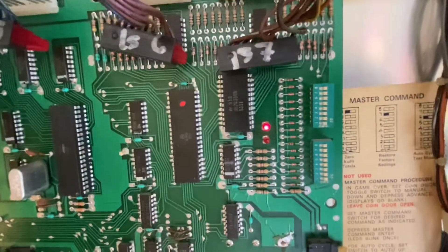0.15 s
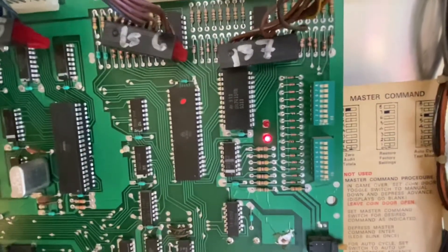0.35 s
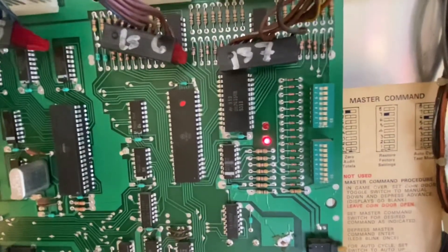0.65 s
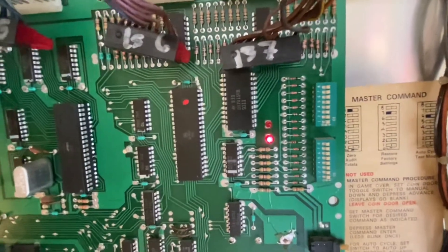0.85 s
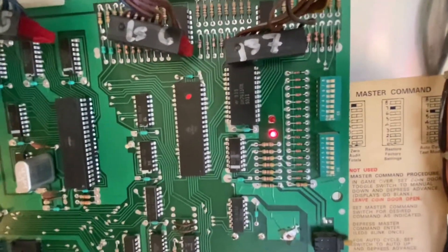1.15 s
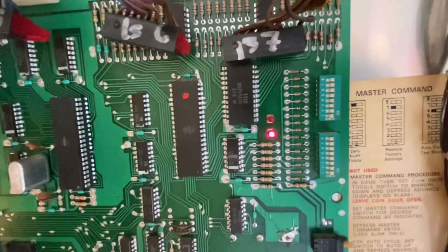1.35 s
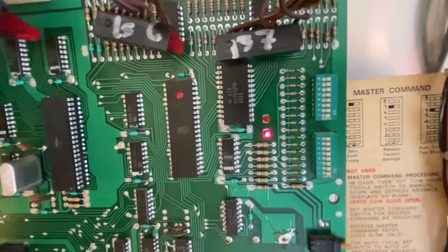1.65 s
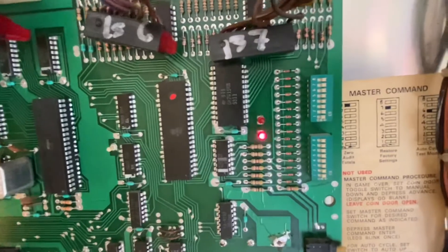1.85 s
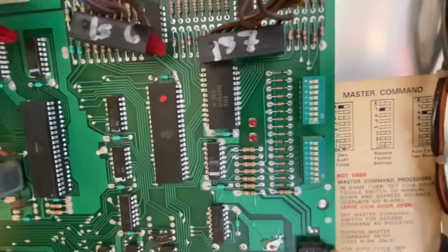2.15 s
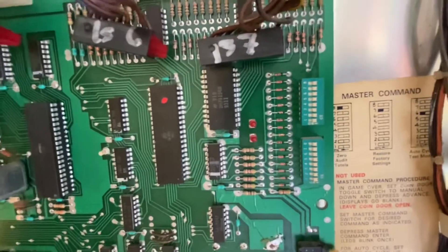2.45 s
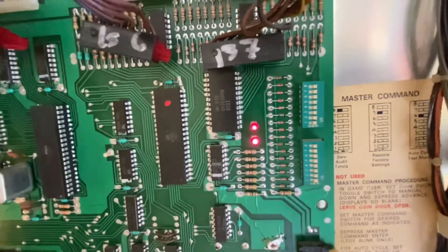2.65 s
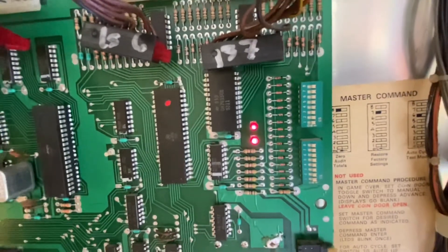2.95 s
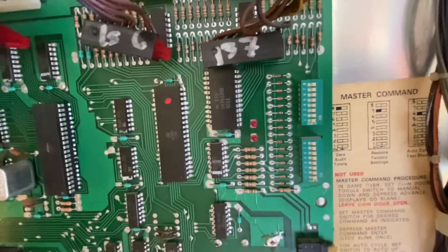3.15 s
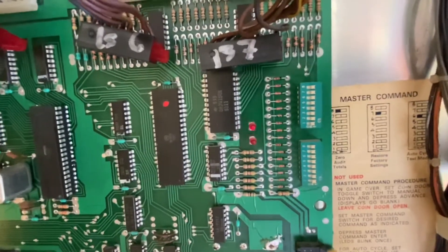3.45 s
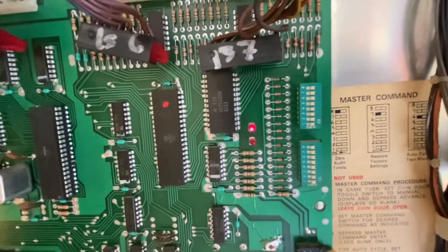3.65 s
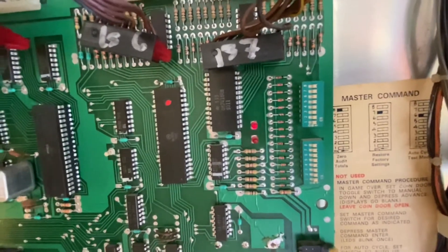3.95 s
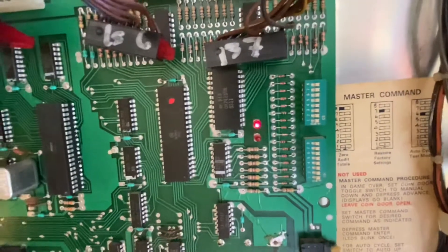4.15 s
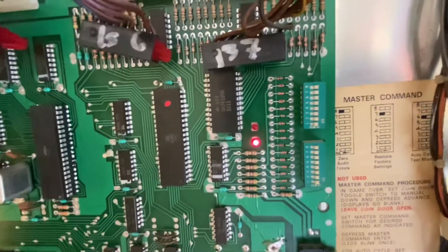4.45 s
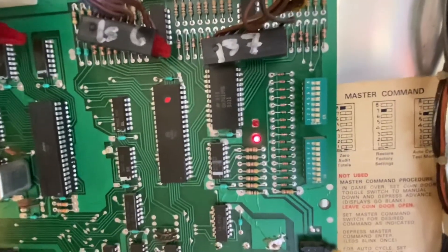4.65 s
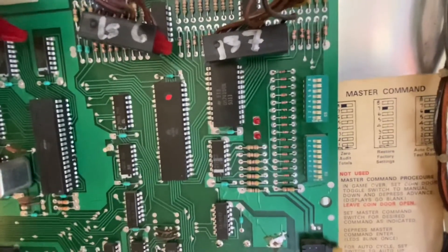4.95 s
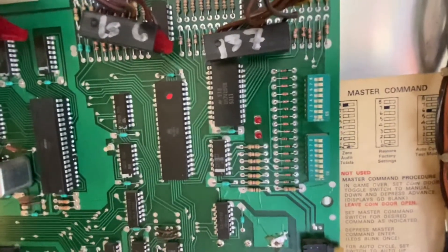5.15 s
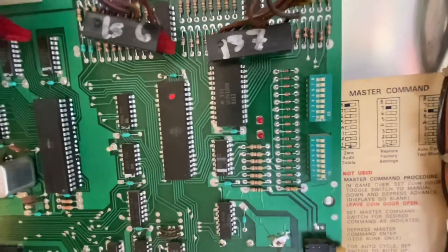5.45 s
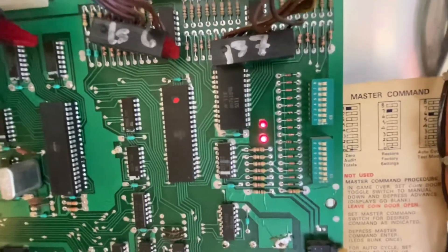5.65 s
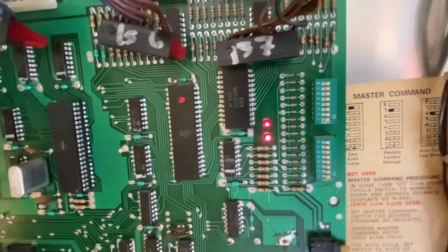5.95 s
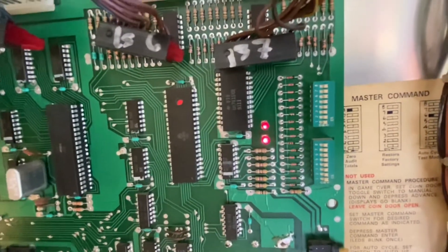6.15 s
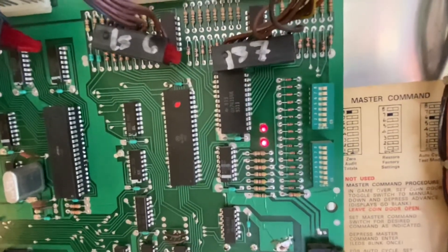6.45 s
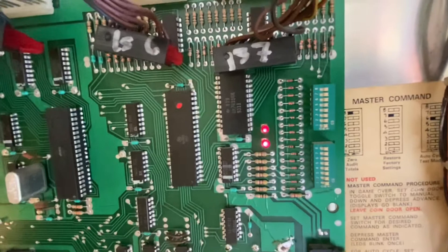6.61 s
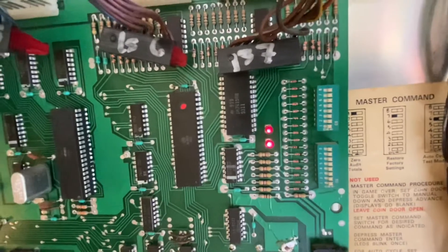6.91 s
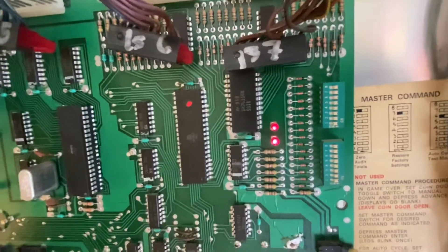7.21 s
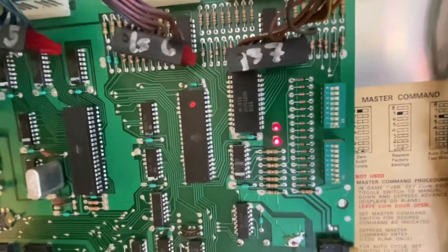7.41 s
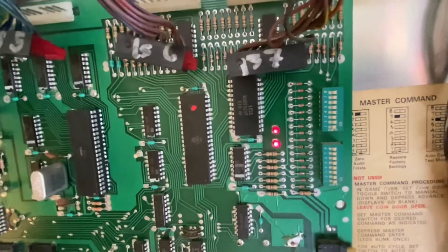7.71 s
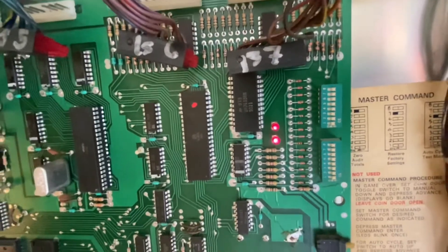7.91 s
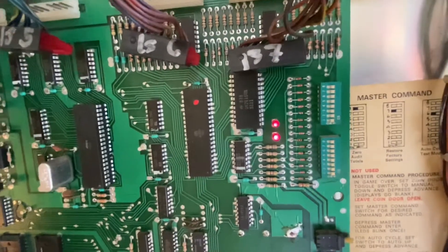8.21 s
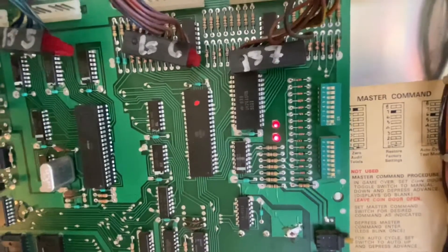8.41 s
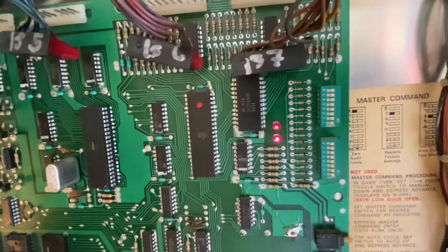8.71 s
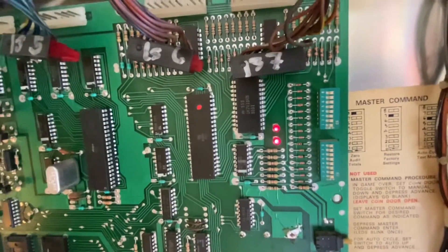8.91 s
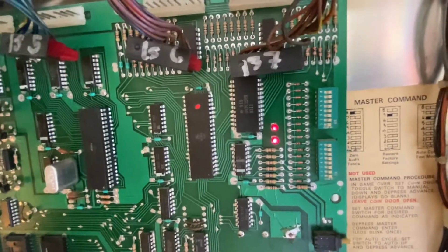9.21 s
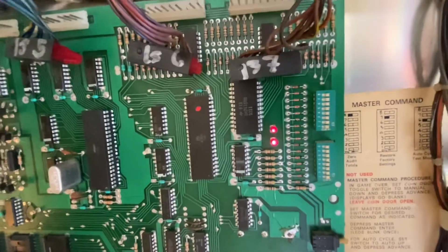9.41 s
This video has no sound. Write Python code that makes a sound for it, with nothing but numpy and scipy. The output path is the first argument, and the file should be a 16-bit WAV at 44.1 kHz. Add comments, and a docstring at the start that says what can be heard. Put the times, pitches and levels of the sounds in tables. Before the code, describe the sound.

A faint squeak, one double click, then a fast hard relay chatter; after quiet humming, a single loud clack and slightly stronger hum.

```python
"""A relay in the open backbox of a powered pinball machine, heard from close by over hum and room rumble.
After one faint squeak of overlapping glides it pulls in and drops out once, then chatters sixteen times.
A squeak later it pulls in and holds: the hum and the rush of air step up; one last squeak follows.
Blows are impacts with a spray of bounces, played through noise bursts and ringing modes of frame,
springs and box; the hum is a sum of mains harmonics, the room is coloured noise, squeaks are rough glides."""
import sys
import numpy as np
from scipy import signal
from scipy.io import wavfile

SR = 44100
rng = np.random.default_rng(int(sys.argv[2]) if len(sys.argv) > 2 else 0)


def store_wav(level_fs):
    """Save 16-bit WAV to argv[1]."""
    pcm = np.round(np.clip(np.atleast_2d(level_fs), -1, 1) * 32767)
    wavfile.write(sys.argv[1], SR, pcm.T.astype(np.int16))


N = 422037

# stereo image of the relay: hz, left_right_correlation [-1 to 1]
RELAY_LIKENESS = [(130, 0.99), (300, 0.97), (640, 0.6), (1400, 0.52), (3000, -0.063), (7000, -0.019),
                  (15000, -0.432)]
# the last pull, after which the relay holds
LATCH_S = 6.05


def relay():
    """The magnet pulls the armature in hard; the spring returns it more softly, thumping the panel."""
    # panels of the box and the relay frame, levels relative to the blow: hz, t60_s, pull_db, drop_db
    panel_modes = [(137, .5, -53, -50), (165, .55, -50, -58), (182, .33, -38, -37), (275, .5, -51, -48),
                   (297, .55, -58, -38), (319, .63, -52, -34), (338, .5, -48, -43), (366, .24, -45, -45),
                   (408, .26, -44, -56), (547, .22, -41, -36), (571, .33, -47, -38), (603, .22, -44, -35),
                   (630, .45, -50, -43), (667, .35, -56, -51), (684, .18, -45, -42), (729, .3, -47, -45),
                   (836, .35, -47, -54), (1079, .26, -43, -56), (1183, .15, -45, -50),
                   (1678, .14, -46, -41), (1816, .17, -43, -43), (2333, .14, -39, -43),
                   (3090, .06, -36, -39), (4134, .09, -41, -36), (4766, .1, -45, -33),
                   (5330, .06, -38, -31), (5660, .05, -34, -27), (6293, .09, -35, -32),
                   (7740, .07, -40, -34), (11900, .07, -38, -48)]
    # spectral density of the clack before its overall gain: hz, relative_db
    pull_colour = [(110, -1.5), (200, -3), (300, -8.5), (600, -2.5), (1200, -6.5), (1650, -2.5), (2050, -4),
                   (2700, 2), (5000, -3.5), (6800, -1), (8300, -9.5), (9800, -2.5), (13400, -11.5),
                   (15500, -9)]
    drop_colour = [(110, 0), (200, -3.5), (450, -7), (620, 7), (1200, -6), (2000, 0), (3000, -2), (5000, 3),
                   (6200, 5.5), (7600, -4), (9400, -3), (11000, -1.5), (13400, -15.5), (15500, -5.5)]
    pulls, drops = armature()

    pull_force = blows(pulls, bounce_db=-7.5, bounce_s=0.0054)
    pull_snap = snap(level_db=-4.5, low_hz=8696, decay_s=0.00033)
    pull_clack = clack(pull_colour, rattle_s=0.006, t60_at_6khz=0.055, build_at_6khz_s=0.00063)
    pull_ring = ringing(panel_modes, 0, build_at_500hz_s=0.0066)
    pull = excite(pull_force, pull_snap, from_db(6.5) * pull_clack, pull_ring)

    drop_force = blows(drops, bounce_db=-5.5, bounce_s=0.0028)
    drop_clack = clack(drop_colour, rattle_s=0.0017, t60_at_6khz=0.056, build_at_6khz_s=0.0011)
    drop_ring = ringing(panel_modes, 1, build_at_500hz_s=0.0024)
    drop = excite(drop_force, from_db(3) * drop_clack, drop_ring)
    return pull + drop + springs(pulls, drops)


def armature():
    """Pulls and drops as (start_s, level_db): one of each per cycle, then a last pull that holds."""
    # the coil is switched on and off in runs: start_s, cycles [count]
    runs = [(2.4869, 1), (3.1211, 16)]
    cycle_s, pull_to_drop_s = .07327, .02535
    pull_level_db, drop_level_db, scatter_db = 2.5, 1.37, 0.61
    from_rest_db = -1.5  # a pull from rest is softer than one in mid-chatter
    pulls, drops = [], []
    for start_s, cycles in runs:
        for k in range(cycles):
            pull_s = start_s + k * cycle_s
            pull_db, drop_db = rng.normal([pull_level_db, drop_level_db], scatter_db)
            if k == 0:
                pull_db += from_rest_db
            pulls.append((pull_s, pull_db))
            drops.append((pull_s + pull_to_drop_s, drop_db))
    pulls.append((LATCH_S, pull_level_db + from_rest_db))
    return pulls, drops


def blows(rows, bounce_db, bounce_s):
    """Contact force: one impact a row, then a spray of tiny bounces that differs every time."""
    t = np.arange(SR // 80) / SR
    bright = signal.butter(1, 1500, "high", fs=SR, output="sos")
    noise = rng.standard_normal((len(rows), len(t)))
    sprays = signal.sosfilt(bright, noise) * np.exp(-t / bounce_s)
    force = np.zeros(N)
    for (start_s, level_db), spray in zip(rows, sprays):
        at = round(start_s * SR)
        force[at] += from_db(level_db)
        force[at:at + len(t)] += from_db(level_db + bounce_db) * energy_one(spray)
    return force


def snap(level_db, low_hz, decay_s):
    """The first sharp crack of steel on steel: a very short burst of high-passed noise."""
    t = np.arange(SR // 100) / SR
    crack = rng.standard_normal((2, len(t))) * np.exp(-t / decay_s)
    high_pass = signal.butter(2, low_hz, "high", fs=SR, output="sos")
    return from_db(level_db) * energy_one(signal.sosfilt(high_pass, crack))


def clack(colour, rattle_s, t60_at_6khz, build_at_6khz_s):
    """The relay's crowded, heavily damped modes as bands of noise, followed by the box's reverberation."""
    # decay of the box's reverberation: hz, t60_s
    box_t60 = [(150, 1), (300, 0.68), (700, 0.17), (2000, 0.53), (5000, 0.5), (11000, 0.31), (14000, 0.3)]
    # energy of the reverberation against the direct clack: hz, relative_db
    box_share = [(150, 7), (600, 14), (1300, -7), (3000, -28), (6500, -21), (11000, -24.5), (16000, -29)]
    t = np.arange(SR * 3 // 4) / SR
    edges = np.geomspace(110, 17000, 30)
    out = 0
    for hz, width, noise in noise_bands(edges, RELAY_LIKENESS, size=len(t)):
        # bending waves disperse: the treble builds first, the bass swells later
        swell = 1 - np.exp(-t / (build_at_6khz_s * 6000 / hz))
        # the armature rattles for a few milliseconds, holding up the bright middle of the clack
        rattle = rattle_s * np.exp(-np.log(hz / 5800) ** 2 / .5)
        direct_t60 = t60_at_6khz * (6000 / hz) ** 0.22
        direct = swell * from_db(-60 * np.maximum(t - rattle, 0) / direct_t60)
        tail = (1 - np.exp(-t / 0.023)) * from_db(-60 * t / at_hz(box_t60, hz))
        share = from_db(at_hz(box_share, hz))
        envelope = np.hypot(energy_one(direct), share * energy_one(tail))
        gain = from_db(at_hz(colour, hz)) * panned(hz) * np.sqrt(2 * width / SR)
        out = out + gain * energy_one(noise * envelope)
    return out


def ringing(modes, stroke, build_at_500hz_s):
    """Distinct modes answer a pull (0) or a drop (1) as decaying sines; likeness sets their stereo phase."""
    t = np.arange(SR) / SR
    out = 0
    for hz, t60, *level_db in modes:
        likeness = np.clip(at_hz(RELAY_LIKENESS, hz), -1, 1)
        apart = np.arccos(likeness) / 2 * np.array([[1], [-1]])
        swell = 1 - np.exp(-t / (build_at_500hz_s * np.sqrt(500 / hz)))
        decay = from_db(level_db[stroke] - 60 * t / t60)
        out = out + panned(hz) * swell * decay * np.sin(2 * np.pi * hz * t + apart)
    return out


def springs(pulls, drops):
    """Each blow stops the springs and sets them ringing afresh, so only the last one of a burst rings out."""
    # springs and contact blades: hz, t60_s, pull_db, drop_db
    spring_modes = [(1001, .7, -70, -51), (1260, .64, -43, -57), (2175, 1.15, -65, -54),
                    (2493, .9, -73, -64), (3328, .72, -54, -53), (3718, .66, -51, -50),
                    (4469, 1.1, -68, -78), (5527, .9, -56, -69), (6654, .4, -53, -64),
                    (7262, .55, -62, -63), (10048, .65, -72, -64), (10190, .45, -66, -61),
                    (10577, .36, -50, -62), (11826, .33, -54, -66), (12700, .5, -57, -74)]
    rings = [ringing(spring_modes, stroke, build_at_500hz_s=0.0018) for stroke in (0, 1)]
    strokes = []
    for stroke, rows in enumerate((pulls, drops)):
        strokes += [(round(start_s * SR), stroke) for start_s, _ in rows]
    out = np.zeros((2, N))
    for at, stroke in sorted(strokes):
        out[:, at:at + SR] = rings[stroke]
    return out


def excite(force, *responses):
    """Play a force through the sum of several stereo responses by convolution."""
    whole = sum(np.pad(r, ((0, 0), (0, SR - r.shape[1]))) for r in responses)
    return signal.oaconvolve(force[None], whole, axes=1)[:, :N]


def panned(hz):
    """Left and right gain at a frequency: the box is heard off centre."""
    # hz, left_minus_right_db
    balance = [(150, 0), (310, -1.5), (550, -2.5), (1100, 6), (2400, 1), (5000, -1.5), (12000, 1)]
    return from_db(at_hz(balance, hz) / 2 * np.array([[1], [-1]]))


def transformer(waver_db):
    """Mains harmonics, in the centre; most of all the upper ones grow with the load, and all waver."""
    # rms levels at no load and full load, before the waver: mains_multiple, idle_db, loaded_db
    harmonics = [(2, -57, -55.5), (3, -75.5, -70.5), (4, -73, -72), (6, -87.5, -83.5), (8, -99.5, -84.5),
                 (10, -86.5, -76.5), (12, -97, -89), (16, -83.5, -77), (20, -99, -80), (22, -107, -103)]
    mains_hz = 60
    t, load = np.arange(N) / SR, electrical_load()
    knots = np.linspace(0, N / SR, 40)
    out = 0
    for multiple, idle_db, loaded_db in harmonics:
        waver = waver_db * np.interp(t, knots, rng.standard_normal(len(knots)))
        gain = np.sqrt(2) * from_db(idle_db + (loaded_db - idle_db) * load + waver)
        out = out + gain * np.sin(2 * np.pi * (round(multiple) * mains_hz * t + rng.random()))
    return out


def electrical_load():
    """Load 0-1 at every sample: a slow warm-up to a standby share, then a quick rise as the relay holds."""
    standby_load, warm_up_s, power_on_s = 0.7, 2.6, .06
    t = np.arange(N) / SR
    warm = 1 - np.exp(-t / warm_up_s)
    powered = 1 - np.exp(-np.maximum(t - LATCH_S, 0) / power_on_s)
    return standby_load * warm + (1 - standby_load) * powered


def room():
    """Low rumble that wanders in level and a faint rush of air that grows with the load, both noise."""
    # spectral density before levelling: hz, relative_db
    rumble_colour = [(25, -27.5), (36, -12.5), (50, 2), (66, -2.5), (90, -1.5), (135, -7.5), (150, -19),
                     (175, -13.5), (230, -23), (300, -24), (400, -35.5)]
    air_colour = [(460, -2), (520, 4.5), (660, -2.5), (950, 2.5), (1200, -4.5), (1500, -15), (2400, -20.5),
                  (5500, -23), (7500, -33.5), (10000, -29.5), (14000, -35.5)]
    rumble_mean_db, rumble_wander_db = -53.5, 1
    air_idle_db, air_loaded_db = -74, -69
    bass = signal.butter(4, [33, 390], "band", fs=SR, output="sos")
    rumble = signal.sosfilt(bass, steady_noise(rumble_colour, np.geomspace(25, 400, 17)))
    air = steady_noise(air_colour, np.geomspace(460, 14000, 18))
    rumble_db = rumble_mean_db + rumble_wander_db * wander(step_s=0.32)
    air_db = air_idle_db + (air_loaded_db - air_idle_db) * electrical_load()
    return from_db(rumble_db) * rumble + from_db(air_db) * air


def steady_noise(spectrum, edges):
    """Stereo noise of the given colour, summed from bands, rms 1."""
    # stereo image of the room: hz, left_right_correlation [-1 to 1]
    room_likeness = [(60, .995), (130, .99), (290, .6), (640, -.3), (1400, .1), (15000, .1)]
    out = 0
    for hz, width, noise in noise_bands(edges, room_likeness, size=N):
        out = out + from_db(at_hz(spectrum, hz)) * np.sqrt(width) * noise
    return rms_one(out)


def wander(step_s):
    """Slow chance: a new random value every step, joined by straight lines."""
    t = np.arange(N) / SR
    values = rng.standard_normal(size=200)
    return np.interp(t / step_s, np.arange(len(values)), values)


def squeaks(roughness_hz):
    """Faint squeaks of gliding tones, the first of three overlapping, rough with low-passed noise."""
    # one glide a row, level ahead of the swell: start_s, length_s, start_hz, end_hz, level_db
    glides = [(2.278, 0.1, 3970, 4600, -62.5), (2.298, 0.14, 2320, 2560, -63.5),
              (2.332, 0.22, 3850, 3284, -59), (5.037, .13, 4280, 3810, -78), (7.46, .13, 4420, 3770, -80.5)]
    out = np.zeros((2, N))
    low_pass = signal.butter(2, roughness_hz, fs=SR, output="sos")
    rough = rms_one(signal.sosfilt(low_pass, rng.standard_normal((2, N))))
    for start_s, length_s, start_hz, end_hz, level_db in glides:
        at, size = round(start_s * SR), round(length_s * SR)
        glide_hz = np.linspace(start_hz, end_hz, size)
        tone = np.sqrt(2) * np.sin(2 * np.pi * np.cumsum(glide_hz) / SR)
        swell = np.sin(np.linspace(0, np.pi, size))  # swells and fades
        out[:, at:at + size] += from_db(level_db) * swell * tone * rough[:, at:at + size]
    return out


def noise_bands(edges, likeness, size):
    """Yield (centre, width, stereo noise) for each band; neighbours get unrelated noise."""
    run_in = SR // 4  # lets the filters settle
    white = rng.standard_normal((2, 2, size + run_in))
    for k, (low, high) in enumerate(zip(edges, edges[1:])):
        band = signal.butter(2, [low, high], "band", fs=SR, output="sos")
        mid, side = signal.sosfilt(band, white[k % 2])[:, run_in:]
        hz = np.sqrt(low * high)
        alike = np.clip(at_hz(likeness, hz), -.99, .999)
        stereo = np.sqrt(1 + alike) * mid + np.sqrt(1 - alike) * side * [[1], [-1]]
        yield hz, high - low, rms_one(stereo)


def at_hz(points, hz):
    """Read a spectrum on a log-frequency axis."""
    f, value = np.transpose(points)
    return np.interp(np.log(hz), np.log(np.maximum(f, 1)), value)


def from_db(db):
    """Decibels to gain."""
    return 10 ** (np.asarray(db) / 20)


def rms_one(x):
    """Scale to rms 1."""
    return x / np.sqrt(np.mean(x ** 2) + 1e-20)


def energy_one(x):
    """Scale each channel to unit energy."""
    return x / np.sqrt(np.sum(x ** 2, axis=-1, keepdims=True) + 1e-20)


def scene():
    """Relay, hum, room and faint squeaks together."""
    return relay() + transformer(waver_db=2.0) + room() + squeaks(roughness_hz=230)


def record(dry):
    """A steep elliptic low-pass cuts the top above 16.4 kHz."""
    return signal.sosfilt(signal.ellip(10, .2, 80, 16400, fs=SR, output="sos"), dry)


dry = scene()
out = record(dry)
store_wav(out)
```